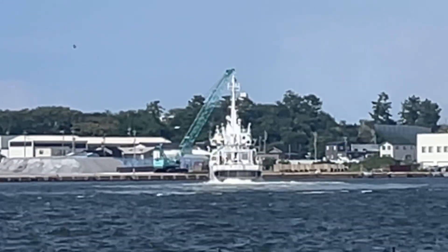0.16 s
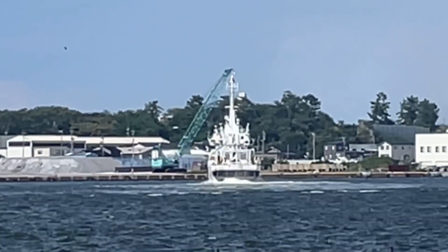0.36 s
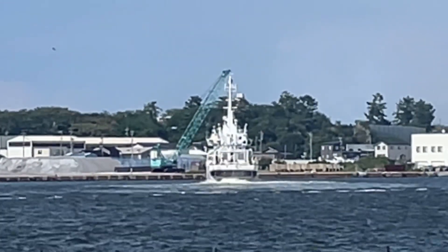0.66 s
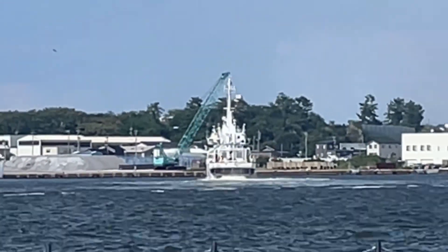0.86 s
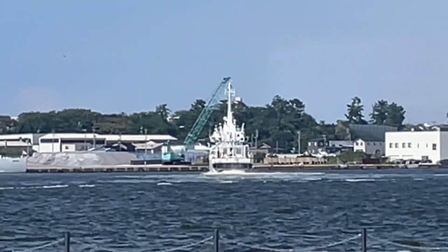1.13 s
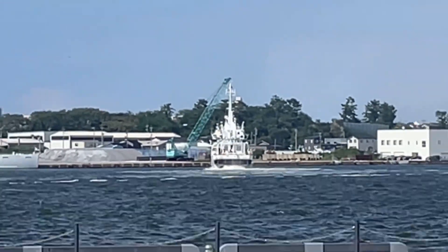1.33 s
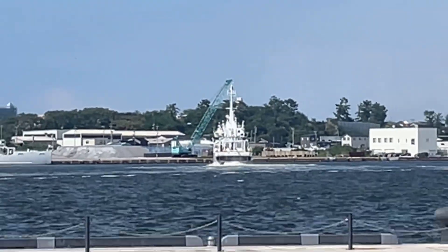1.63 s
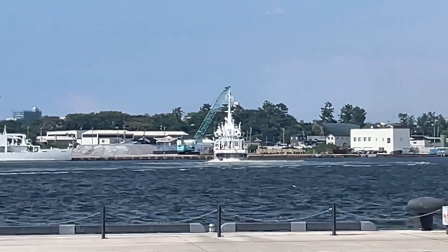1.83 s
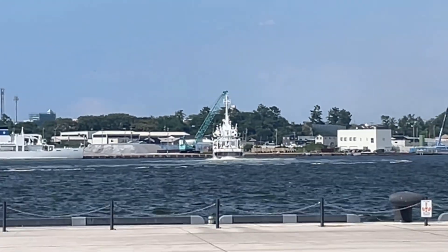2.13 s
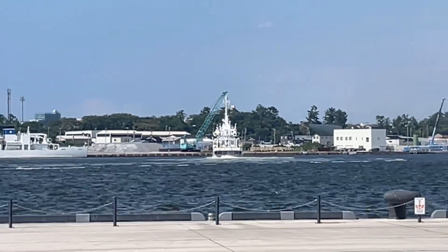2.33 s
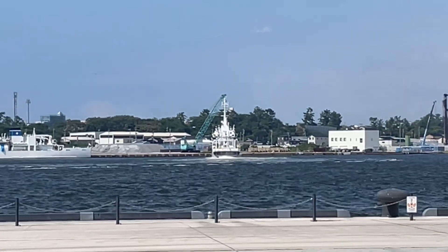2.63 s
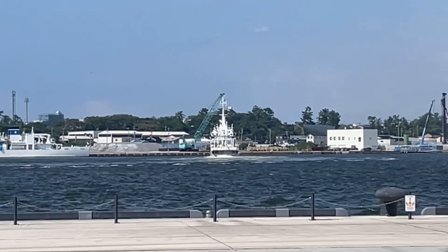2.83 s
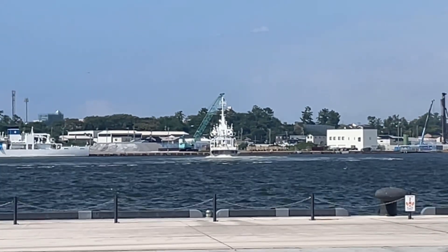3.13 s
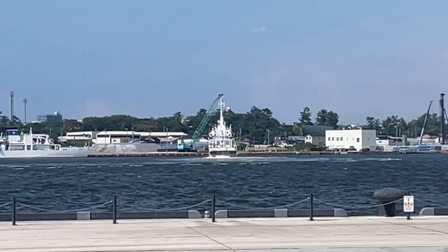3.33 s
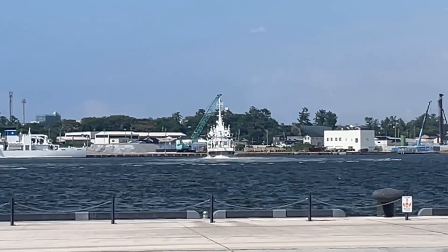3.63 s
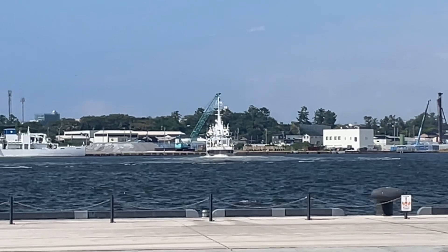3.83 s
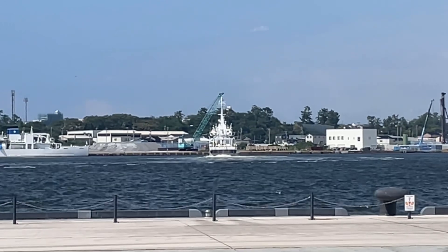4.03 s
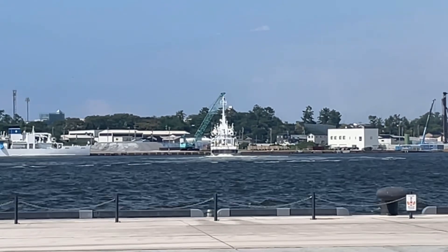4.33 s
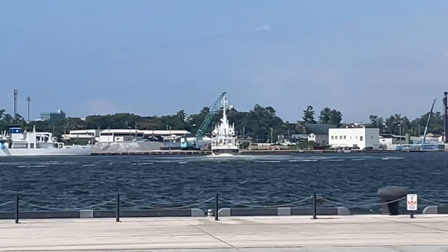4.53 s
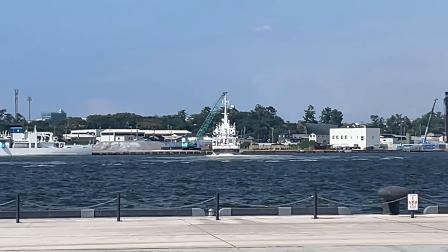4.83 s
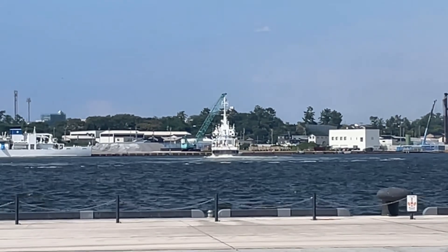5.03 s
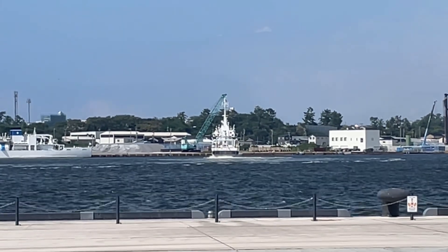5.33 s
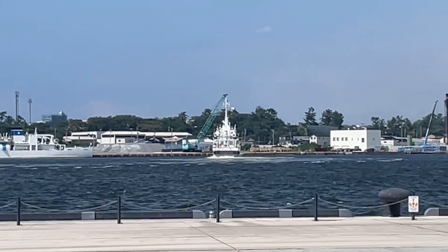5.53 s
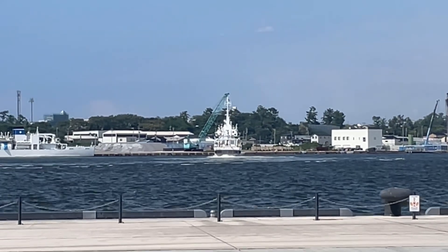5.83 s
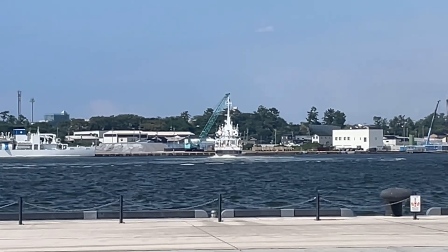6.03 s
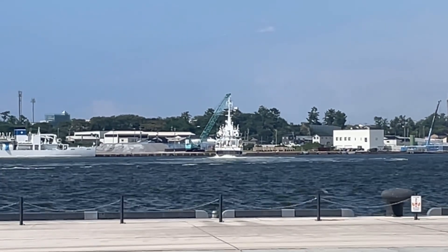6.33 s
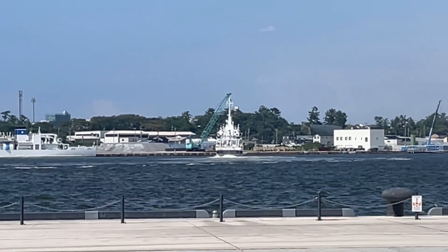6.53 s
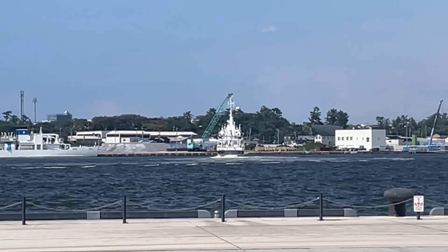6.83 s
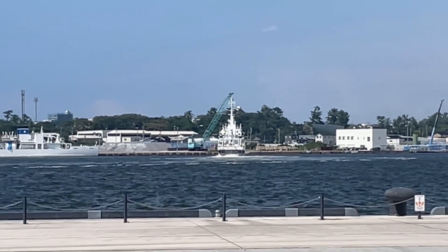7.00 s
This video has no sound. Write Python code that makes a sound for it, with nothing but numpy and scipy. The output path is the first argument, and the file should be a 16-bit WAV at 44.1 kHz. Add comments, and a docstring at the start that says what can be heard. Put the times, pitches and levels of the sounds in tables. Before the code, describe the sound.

Low beating ship engines hum over open water while small waves fizz and plop at the quay; near the end wind buffets the microphone.

```python
"""A deep, throbbing drone comes over a breezy harbour: a patrol vessel heard from the quay.
Summed sines on the crank angles of two slow diesels and two generator sets beat and fade; noise adds exhaust roar.
Shaped noise makes the chop, lapping and foam; short ringing sines make drops, splashes and bubbles.
Near the end a gust, made of low noise in brief swells, thumps and flutters on the microphone."""
import sys
import numpy as np
from scipy import signal
from scipy.fft import irfft
from scipy.io import wavfile
from scipy.ndimage import uniform_filter1d

SR = 44100
rng = np.random.default_rng(int(sys.argv[2]) if len(sys.argv) > 2 else 0)


def transcribe(signal):
    """Save signal, clipped to [-1, 1], as a 16-bit WAV file at the path in sys.argv[1]."""
    frames = np.atleast_2d(signal).T
    limited = np.clip(frames, -1, 1)
    pcm = np.round(limited * 32767).astype(np.int16)
    wavfile.write(sys.argv[1], SR, pcm)


N = 315800

# mean cycle rates of the two main diesels; the second runs a shade slower
FIRST_CYCLE_HZ, SECOND_CYCLE_HZ = 5.409, 5.379
FADING_DB = 2.5   # spread of the slow fading of a single exhaust line
WAVE_S, WAVE_HOLD_S = 4.08, 0.4   # start of the nearer wave, and how long it stays full
# Colour of the fizzing water near the quay. Each row: pitch in Hz, density in dB per Hz.
FIZZ_SPECTRUM = [(900, -18.5), (1500, -1), (1950, 5.5), (2500, -0.5), (3300, -6), (4600, -9.5),
                 (6000, -13.5), (7200, -26), (8200, -40.5), (11500, -17), (14000, -31.5)]


def from_db(db):
    """Amplitude factor of a level in dB."""
    return np.exp(np.asarray(db) * (np.log(10) / 20))


def rms_one(x):
    """The same sound scaled to rms 1."""
    return x / np.sqrt(np.mean(np.abs(x) ** 2) + 1e-20)


def in_time(rows):
    """Each column of a curve at every sample."""
    s, *columns = np.transpose(rows)
    return [np.interp(np.arange(N) / SR, s, column) for column in columns]


def at_hz(points, hz):
    """A spectrum read on a log-frequency axis."""
    points_hz, values = np.array(points).T[:2]
    return np.interp(np.log(hz), np.log(points_hz), values)


def drift(rate_hz):
    """Slow chance of rms 1: sparse noise through a double one-pole low-pass, run in."""
    r = np.exp(-200 * np.pi * rate_hz / SR)   # one noise value per 100 samples
    sparse = rng.standard_normal(N // 100 + 3002)
    slow = rms_one(signal.lfilter([1], [1, -2 * r, r * r], sparse)[3000:])
    return np.interp(np.arange(N) / 100, np.arange(len(slow)), slow)


def bump(s, length_s):
    """A smooth bell of height 1 around a moment; length_s is its standard deviation."""
    out = np.zeros(N)
    first = max(0, int((s - 5 * length_s) * SR))
    last = min(N, int((s + 5 * length_s) * SR))
    near = np.arange(first, last)
    out[near] = np.exp(-.5 * ((near / SR - s) / length_s) ** 2)
    return out


def lean(x, left_db):
    """Makes the left louder than the right by so much."""
    return x * from_db([[left_db / 2], [-left_db / 2]])


def spread(mid, side, hz):
    """Two unrelated noises become one band in two ears, with a width and a left lean set for its pitch."""
    # Left-right likeness used for each pitch; the hiss from 2.8 to 5.5 kHz sits in the centre.
    # Each row: pitch in Hz, likeness from 0 to 1.
    likeness = [(60, 1), (120, 0.86), (200, 0.57), (320, 0.76), (520, 0.065), (750, 0.48), (1130, 0.88),
                (1400, 0.75), (1680, 0.22), (2050, 0.94), (2800, 1), (5500, 1), (6800, 0.36), (11000, 0.23)]
    # Lean used for each pitch. Each row: pitch in Hz, left minus right in dB.
    left_lean = [(45, 2.5), (90, 4), (150, 2), (450, 2), (800, 0.7), (1500, 1.8), (1900, 4.5), (2700, -0.5)]
    alike = np.clip(at_hz(likeness, hz), 0, .9998)
    opposed = side * np.array([[1], [-1]])
    both = np.sqrt((1 + alike) / 2) * mid + np.sqrt((1 - alike) / 2) * opposed
    return lean(both, at_hz(left_lean, hz))


def banded_noise(spectrum, patchy_db, flicker_hz):
    """Third-octave bands of stereo noise, each with its own level, flicker and width; rms 1."""
    edges = 18 * 2 ** (np.arange(30) / 3)
    white = rng.standard_normal((2, 2, N + SR // 4))   # neighbouring bands get unrelated noise
    together = drift(flicker_hz / 2) / 2   # unevenness common to all bands
    out = np.zeros((2, N))
    for k, (low, high) in enumerate(zip(edges, edges[1:])):
        if high < spectrum[0][0] or low > spectrum[-1][0]:
            continue
        band_filter = signal.butter(2, [low, high], "band", fs=SR, output="sos")
        band = signal.sosfilt(band_filter, white[k % 2])[:, -N:]
        hz = np.sqrt(low * high)
        level_db = at_hz(spectrum, hz) + patchy_db * (together + drift(flicker_hz))
        out += spread(*band, hz) * from_db(level_db)
    return rms_one(out)


def rush_band(hz, width_hz):
    """A narrow band of rushing noise; rms 1."""
    band = signal.butter(2, [hz - width_hz / 2, hz + width_hz / 2], "band", fs=SR, output="sos")
    return rms_one(spread(*signal.sosfilt(band, rng.standard_normal((2, N))), hz))


def ring(clicks, hz, t60):
    """Each click starts a sine, of height 1 for a unit click, that falls 60 dB in t60 seconds."""
    r = from_db(-60 / (t60 * SR))
    w = 2 * np.pi * min(hz, SR / 2.5) / SR
    return signal.lfilter([0, np.sin(w)], [1, -2 * r * np.cos(w), r * r], clicks + 1e-18)


def crank(cycle_hz, hunting):
    """Angle of an engine's cycle; the governor lets the speed wander by a small share."""
    return 2 * np.pi * np.cumsum(cycle_hz * (1 + hunting * drift(0.87))) / SR


def line(angle, level_db, fading_db):
    """One exhaust line; moving air between ship and quay makes it swell and fade."""
    wave = np.sin((angle + rng.uniform(0, 2 * np.pi)).astype(np.float32))
    fading = rms_one(from_db(fading_db * drift(0.95)))
    return np.sqrt(2) * wave * from_db(level_db) * fading


def beating(first, second, order, first_db, second_db, in_step_s):
    """The same line from two engines; it beats at its multiple of their difference in speed."""
    at, start = int(in_step_s * SR), rng.uniform(0, 2 * np.pi)
    return np.sqrt(2) * sum(from_db(level_db) * np.sin(order * (angle - angle[at]) + start)
                            for angle, level_db in ((first, first_db), (second, second_db)))


def weak_lines(angle):
    """One cycle of uneven exhaust puffs, smeared by pipe and hull, repeated as the crank turns."""
    # Weak lines that uneven cylinders put on every multiple. Each row: pitch in Hz, relative level in dB.
    weak_spectrum = [(38, -66), (55, -43), (90, -51), (112, -54), (155, -54), (190, -63.5), (245, -55),
                     (320, -70.5), (440, -66.5)]
    size = 2048   # points in the cycle
    orders = np.arange(7, 82)
    heights = from_db(at_hz(weak_spectrum, orders * FIRST_CYCLE_HZ))
    partials = np.zeros(size // 2 + 1, complex)
    partials[orders] = heights * np.exp(2j * np.pi * rng.random(len(orders)))
    cycle = irfft(partials) * size / np.sqrt(2)
    return np.interp(angle / (2 * np.pi) % 1, np.arange(size) / size, cycle)


def diesels():
    """Lines a cycle rate apart make the throb; the two engines slide slowly in and out of step."""
    # Exhaust lines of the first diesel. Each row: multiple of the cycle rate, relative level in dB.
    exhaust_lines = [(8, -52), (10, -45), (11, -36.5), (12, -37), (13, -35.5), (14, -49), (16, -41),
                     (17, -46), (19, -40.5), (20, -46), (22, -50), (23, -36), (24, -44.5), (25, -40.5),
                     (27, -45), (29, -40.5), (30, -50), (32, -50), (33, -49.5), (45, -55), (46, -54),
                     (47, -59), (48, -59), (54, -56.5), (55, -57.5), (59, -61)]
    # How well the sound carries over the water.
    # Each row: time in seconds, then gain in dB of the boom, drone, high hum and throb.
    carry = [(0, 1, 4.5, 1.5, -1.5), (0.7, -5.5, 5.5, 4, -2.5), (1.3, 0.5, -8.5, -5.5, -1.5),
             (2.1, -0.5, 1, -1, 0.5), (3.05, -1.5, -3, -3, -2.5), (3.7, -6.5, -5, -8, 1),
             (4.5, 4, 0.5, -0.5, -2), (5.1, 5.5, 0, -1, 1), (5.6, 0, -2, 2, -6), (6.4, -4.5, -1, 0.5, 0.5),
             (7.15, -9.5, 3, -1.5, 1.5)]
    # How well the deepest lines carry. Each row: time in seconds, gain in dB.
    deep_carry = [(0, 2), (1.5, 1), (2.5, -5), (3.1, -0.5), (3.7, -1), (4.3, -4), (5.2, 1.5), (7.16, 3)]
    deep_below = 13   # multiples under this follow the deep curve instead of the throb
    # Strong lines sent by both diesels. Each row: multiple of the cycle rate, relative level in dB
    # of the first diesel, of the second, time in seconds when they are in step.
    boom_row = (15, -28.5, -38, 4.8)
    drone_row = (28, -41, -34, 2.35)
    high_hum_row = (44, -44, -55, 2.35)
    # Further hums with the same columns.
    hum_rows = [(26, -41, -46, 4.55), (31, -45, -50, 3.65), (37, -50.5, -45.5, 3.75),
                (38, -57, -52.5, 3.85), (39, -60, -56, 3.85)]

    boom_db, drone_db, high_hum_db, throb_db = in_time(carry)
    deep_db, = in_time(deep_carry)
    first = crank(FIRST_CYCLE_HZ, hunting=0.0006)
    second = first * SECOND_CYCLE_HZ / FIRST_CYCLE_HZ
    throb = sum(line(round(k) * first, level_db + (deep_db if k < deep_below else throb_db), FADING_DB)
                for k, level_db in exhaust_lines)
    boom = from_db(boom_db) * beating(first, second, *boom_row)
    drone = from_db(drone_db) * beating(first, second, *drone_row)
    high_hum = from_db(high_hum_db) * beating(first, second, *high_hum_row)
    hums = from_db(-2.73) * sum(beating(first, second, *row) for row in hum_rows)
    return throb + boom + drone + hums + high_hum + from_db(-4.5) * weak_lines(second)


def generators():
    """Two small, fast engines at nearly the same speed beat a little under twice a second."""
    # Firing lines of the two sets: slower pitch in Hz, its relative level in dB, faster pitch in Hz,
    # its relative level in dB, time in seconds when they are in step.
    firing_pair = (89.2, -37.5, 90.9, -36.5, 3.56)
    # Weaker lines of the sets. Each row: pitch in Hz, relative level in dB.
    weaker_lines = [(78.4, -44), (158.8, -42.5), (181.8, -53), (219, -55)]
    slow_hz, slow_db, fast_hz, fast_db, in_step_s = firing_pair
    slow = crank(slow_hz, hunting=0.0006)
    firing = beating(slow, slow * fast_hz / slow_hz, 1, slow_db, fast_db, in_step_s)
    weaker = sum(line(crank(hz, hunting=0.001), level_db, FADING_DB) for hz, level_db in weaker_lines)
    return from_db(1.14) * (firing + weaker)


def roar():
    """Hot gas leaves the funnel as a low, rough rush."""
    # Colour of the turbulent exhaust. Each row: pitch in Hz, density in dB per Hz.
    roar_spectrum = [(20, -38.5), (35, -11), (52, 0.5), (80, -2), (110, -7), (155, -5.5), (195, -15),
                     (245, -14.5), (330, -20.5), (480, -27.5), (900, -56.5)]
    # Strength of the exhaust. Each row: time in seconds, relative level in dB.
    roar_curve = [(0, -29.5), (1.2, -33), (2.1, -33.5), (2.9, -34), (3.6, -30.5), (4.5, -30.5), (6, -31),
                  (6.8, -33.5), (7.16, -32)]
    level_db, = in_time(roar_curve)
    return from_db(level_db - 0.8) * banded_noise(roar_spectrum, patchy_db=1.0, flicker_hz=6.0)


def chop():
    """Far chop is a smooth wash that brightens as it swells."""
    # Strength of the far chop. Each row: time in seconds, relative level in dB.
    chop_curve = [(0, -49.5), (0.5, -50.5), (1.7, -49), (2.5, -49), (3.3, -48.5), (3.8, -47), (4.2, -46.5),
                  (4.7, -47), (5.3, -47), (5.9, -49), (6.4, -49), (6.95, -47.5), (7.16, -51)]
    # Colour of the wash. Each row: pitch in Hz, density in dB per Hz.
    wash_spectrum = [(250, -13.5), (420, -3.5), (560, 2.5), (750, 1), (950, -3.5), (1200, -9.5),
                     (1600, -26.5), (2500, -31)]
    crest_db, crest_follows = -67, 6   # mean level of the bright band; its dB per dB of the wash
    wash_db, = in_time(chop_curve)
    wash = from_db(wash_db - 3.5) * banded_noise(wash_spectrum, patchy_db=1.5, flicker_hz=9.3)
    swell_db = crest_follows * (wash_db - wash_db.mean())
    crests = from_db(crest_db + swell_db + 0.92 * drift(1.8))
    return wash + crests * rush_band(hz=850, width_hz=270)


def lapping():
    """Water laps steadily along the quay and stays a little louder behind the nearer wave."""
    # Colour of the lapping. Each row: pitch in Hz, density in dB per Hz.
    lapping_spectrum = [(700, -13.5), (1050, -8.5), (1250, 4.5), (1470, 3.5), (1680, 3.5), (1900, -13),
                        (2800, -40)]
    before_db, after_db = -62.5, -61
    level_db, = in_time([(WAVE_S, before_db), (WAVE_S + WAVE_HOLD_S, after_db)])
    return from_db(level_db) * banded_noise(lapping_spectrum, patchy_db=2.0, flicker_hz=2.1)


def droplets(per_s, spread_db):
    """Tiny bubbles and drops, in clumps as wavelets break, each ringing a few cycles; rms 1."""
    signs = rng.choice([-1, 1], N)
    sizes = from_db(spread_db * np.minimum(rng.exponential(1, N), 3)) * signs
    born = rng.random(N) < per_s * from_db(2.5 * drift(4.0)) / SR
    pitches, cycles = np.geomspace(2400, 7000, 16), 14   # Hz; cycles until 60 dB down
    dealt = rng.integers(0, len(pitches), N)   # which pitch each drop gets
    return rms_one(sum(ring(sizes * born * (dealt == k), hz, cycles / hz) * from_db(at_hz(FIZZ_SPECTRUM, hz) / 2)
                       for k, hz in enumerate(pitches)))


def fizz():
    """Nearby waves fizz: a bed of hiss with countless small drops in it."""
    hiss = banded_noise(FIZZ_SPECTRUM, patchy_db=.8, flicker_hz=10.0)
    drops = from_db(-8.5) * droplets(per_s=720, spread_db=5.5)
    level_db = -61.5 + 0.5 * drift(9.8)   # quick unevenness
    return from_db(level_db) * (hiss + drops)


def foam():
    """Wavelets break, each with a short, grainy hiss."""
    # Breaking wavelets. Each row: centre in seconds, half length in seconds, level in dB at the height.
    wavelets = [(0.63, 0.037, -72), (1.305, 0.067, -67.5), (1.585, .05, -73), (1.907, 0.063, -66),
                (2.38, 0.062, -72.5), (2.83, 0.08, -71), (3.54, .04, -76), (3.83, 0.06, -68.5),
                (5.55, .05, -72), (6.28, 0.08, -68.5)]
    # Colour of the foam. Each row: pitch in Hz, density in dB per Hz.
    foam_spectrum = [(2000, -12.5), (3200, -4), (4500, -2), (6000, -9), (7200, -12), (8500, -28),
                     (11500, -17)]
    breaking = sum(from_db(level_db) * bump(s, length_s) for s, length_s, level_db in wavelets)
    return breaking * banded_noise(foam_spectrum, patchy_db=6.0, flicker_hz=130.0)


def small_splashes():
    """Rows like those of the loud splashes, drawn by chance."""
    per_s, mean_db, middle_hz, cycles = 3, -56.5, 4600, 8
    chance = rng.uniform(-1, 1, (64, 3))
    rows = [((when + 1) / 2 * N / SR, mean_db + 3.0 * strength, middle_hz * 2 ** (.45 * pitch), cycles)
            for when, strength, pitch in chance]
    return rows[:round(per_s * N / SR)]


def splashes(scatter_s, spray_db, slap_db, count):
    """A drop lands with a dry slap and rings briefly; fainter spray of other pitches falls just after."""
    # The loudest splashes at the quay wall.
    # Each row: start in seconds, relative level in dB, pitch in Hz, cycles rung until 60 dB down.
    loud_splashes = [(0.024, -46, 7000, 21), (0.293, -52, 5560, 11), (0.632, -52, 10500, 18),
                     (0.786, -54, 5200, 11), (0.82, -48, 3900, 14), (0.884, -50, 4800, 7),
                     (0.984, -48.5, 5200, 6), (1.284, -50, 4600, 16), (1.308, -43, 4800, 7.9),
                     (2.81, -59, 9900, 18), (2.822, -46, 3000, 12), (3.2, -47, 5200, 11),
                     (3.503, -44, 3970, 9), (3.53, -48, 6600, 15), (3.738, -51, 4700, 26),
                     (3.79, -43, 3770, 10), (3.842, -47, 4800, 17), (4.055, -42, 4300, 6),
                     (4.077, -46.5, 3900, 8), (4.14, -50.5, 5350, 18), (4.856, -46, 5850, 11),
                     (5.14, -52, 10800, 18), (5.286, -38, 4200, 4.9), (5.672, -47.5, 4430, 9.6),
                     (6.335, -52, 5950, 14), (6.896, -44, 3700, 12), (6.9, -41, 5400, 23),
                     (6.903, -50, 5200, 8)]
    size = SR // 10
    out = np.zeros(N + SR)
    for s, peak_db, hz, cycles in list(loud_splashes) + small_splashes():
        start = round(s * SR)
        for k, (when, pitch, strength) in enumerate(rng.standard_normal((count, 3))):
            small = k > 0   # the first drop is the main one, the rest are spray
            delay = min(int(small * abs(when) * scatter_s * SR), size - 1)
            click = np.zeros(size)
            click[delay] = from_db(peak_db + small * (spray_db + 2 * strength))
            drop_hz = hz * 2 ** (small * pitch * 0.13)
            out[start:start + size] += ring(click, drop_hz, cycles / drop_hz) + from_db(slap_db) * click
    return signal.sosfilt(signal.butter(2, [2400, 11000], "band", fs=SR, output="sos"), out[:N])


def wind():
    """Eddies on the microphone: light air hardly shows, each gust thumps."""
    # Colour of the buffeting. Each row: pitch in Hz, density in dB per Hz.
    buffet_spectrum = [(20, -27.5), (35, -11.5), (55, 6), (82, 11.5), (115, -7.5), (170, -12.5),
                       (300, -35.5), (700, -53.5)]
    # Strength of the breeze. Each row: time in seconds, level in dB.
    breeze_curve = [(0, -47), (1.3, -35), (1.9, -44), (2.4, -40), (3, -45.5), (4.6, -42.5), (5.2, -33.5),
                    (5.8, -35.5), (6.45, -24.5), (7.16, -31)]
    # Eddies of the gust that thump. Each row: centre in seconds, level in dB added at the height.
    thumps = [(6.2, -21), (6.248, -15), (6.355, -25.5), (6.455, -23), (6.56, -19.5), (6.655, -17.5),
              (6.868, -18), (7.052, -24)]
    breeze_db, = in_time(breeze_curve)
    eddies = banded_noise(buffet_spectrum, patchy_db=1.0, flicker_hz=8.3)
    # level the noise, so that breeze and thumps set the force
    power = uniform_filter1d(np.mean(eddies ** 2, axis=0), SR // 14)
    eddies = eddies / np.sqrt(power + 1e-6)
    force = from_db(breeze_db) + sum(from_db(level_db) * bump(s, length_s=0.02) for s, level_db in thumps)
    return lean(force * eddies, left_db=-3.5)


def swells():
    """Shifting air paths lift now one band of the distant rush, now another."""
    # Each row: centre in seconds, half length in seconds, level in dB at the height, pitch in Hz.
    swell_rows = [(0.862, 0.16, -58.5, 1090), (1.705, 0.12, -63.5, 1176), (1.951, 0.1, -56.5, 853),
                  (2.167, 0.25, -63.5, 2000), (2.194, 0.43, -61, 636), (2.807, 0.074, -67, 2620),
                  (4.699, 0.039, -60.5, 1920), (5.154, 0.07, -55, 920), (5.15, 0.11, -63, 2060),
                  (5.4, 0.35, -59, 466), (5.944, 0.38, -61, 1026), (6.961, 0.23, -62, 1054)]
    width = 0.15   # as a share of the pitch
    return sum(from_db(level_db) * bump(s, length_s) * rush_band(hz, width * hz)
               for s, length_s, level_db, hz in swell_rows)


def bubbles(attack_s, t60, rise_per_s):
    """A larger bubble pings as it closes; its pitch creeps up as it nears the surface."""
    # Single bubbles at the quay wall. Each row: start in seconds, relative level in dB, starting pitch in Hz.
    pings = [(1.57, -60, 3500), (2.655, -55.5, 3840), (3.488, -56, 3640), (6.92, -57, 3800)]
    out, t = np.zeros(N + SR), np.arange(SR // 8) / SR
    envelope = (1 - np.exp(-t / attack_s)) * from_db(-60 * t / t60)
    for s, level_db, hz in pings:
        start = round(s * SR)
        wave = np.sin(2 * np.pi * hz * t * (1 + rise_per_s * t / 2))
        out[start:start + len(t)] += from_db(level_db) * envelope * wave
    return out[:N]


def near_wave():
    """One wave rises quickly, rushes on for a while and drains away."""
    attack_s, release_s = 0.12, 0.61
    corners = WAVE_S + np.cumsum([0, attack_s, WAVE_HOLD_S, release_s])
    shape = np.interp(np.arange(N) / SR, corners, [0, 1, 1, 0])
    return from_db(-57) * shape * rush_band(hz=1400, width_hz=340)


def flutters(width_hz):
    """Small, quick eddies in the gust puff at a higher pitch than the thumps."""
    # Each row: centre in seconds, half length in seconds, level in dB at the height, pitch in Hz.
    flutter_rows = [(5.92, 0.021, -49.5, 320), (6.424, 0.016, -50.5, 393), (6.766, 0.0068, -40, 396),
                    (6.806, 0.021, -38.5, 295), (7.042, 0.011, -42, 330)]
    return sum(from_db(level_db) * bump(s, length_s) * rush_band(hz, width_hz)
               for s, length_s, level_db, hz in flutter_rows)


def scene():
    """The ship ahead and a shade to the left, water all round, wind at the microphone."""
    ship = lean(diesels() + generators(), left_db=2.0) + roar()
    spray = splashes(scatter_s=0.004, spray_db=-14.0, slap_db=-8.5, count=3)
    pings = bubbles(attack_s=0.0048, t60=0.081, rise_per_s=0.44)
    water = chop() + lapping() + fizz() + foam() + near_wave() + spray + pings
    return ship + water + wind() + flutters(width_hz=78) + swells()


def record(dry):
    """Deep bass and the top are cut; a mirrored run-in lets the filters settle."""
    run_in = SR // 10
    sound = np.pad(dry, ((0, 0), (run_in, 0)), mode="reflect")
    heard = signal.sosfilt(signal.butter(2, 28, "high", fs=SR, output="sos"), sound)
    return signal.sosfilt(signal.butter(12, 12500, fs=SR, output="sos"), heard)[:, run_in:]


dry = scene()
out = record(dry)
transcribe(out)
```